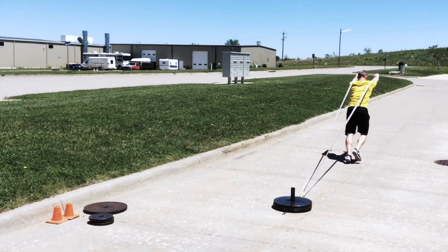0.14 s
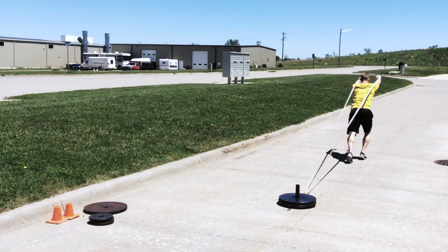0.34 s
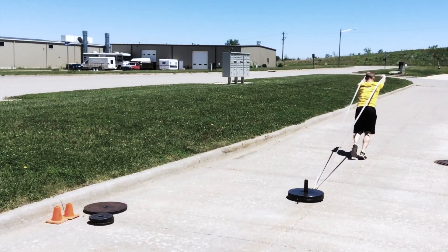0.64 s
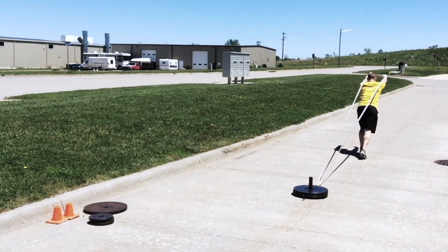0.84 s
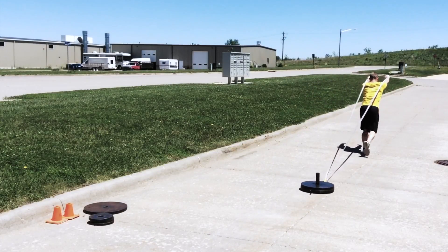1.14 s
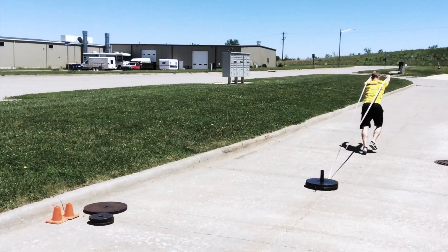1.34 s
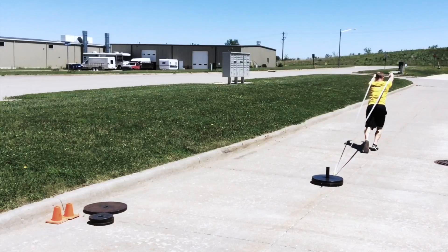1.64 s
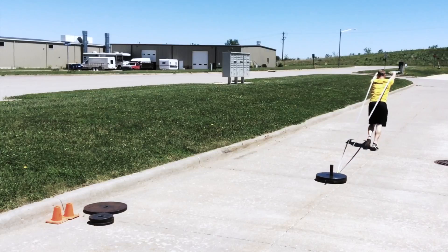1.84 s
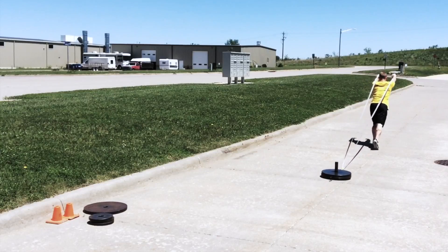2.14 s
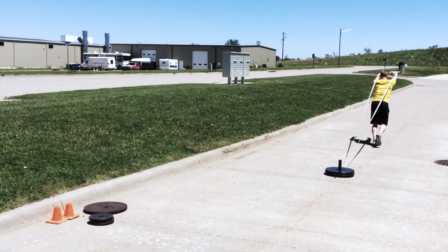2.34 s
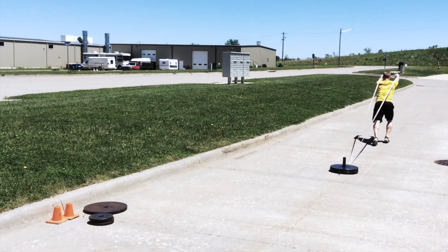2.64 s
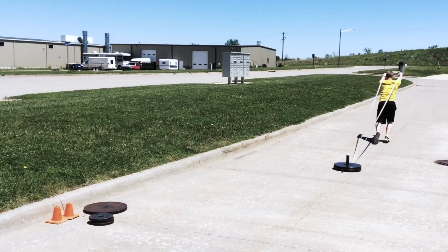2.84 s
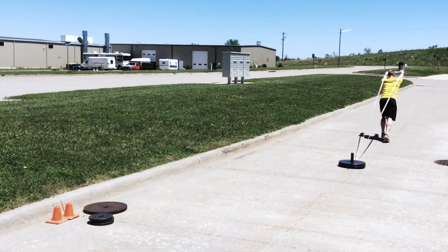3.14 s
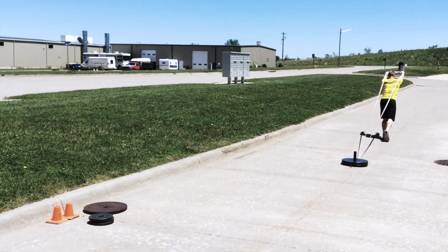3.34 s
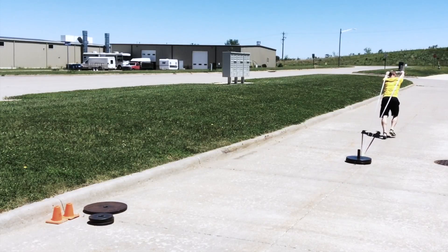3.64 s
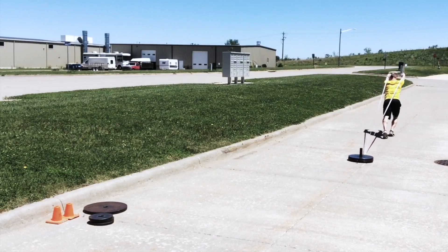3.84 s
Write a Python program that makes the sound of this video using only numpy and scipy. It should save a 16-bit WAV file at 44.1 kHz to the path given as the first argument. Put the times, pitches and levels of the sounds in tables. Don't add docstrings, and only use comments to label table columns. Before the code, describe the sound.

Gritty steel scraping of a dragged sled on concrete, fading with distance under buffeting wind.

```python
import sys
import numpy as np
from scipy import signal
from scipy.fft import rfft, irfft, next_fast_len
from scipy.io import wavfile
from scipy.ndimage import uniform_filter1d, map_coordinates

SR = 44100
rng = np.random.default_rng(int(sys.argv[2]) if len(sys.argv) > 2 else 0)


def voltage_ratio(level):
    return 10 ** (np.asarray(level, float) / 20)


def unload_wav(signal):
    wavfile.write(
        sys.argv[1],
        SR,
        np.round(np.clip(np.atleast_2d(signal).T, -1, 1) * 32767).astype(np.int16),
    )


N = 176400
FULL_SCALE = 0.086


def unit(x):
    return x / np.sqrt(np.mean(x ** 2) + 1e-20)


def noise():
    return rng.standard_normal(N)


def along(points, hz):
    f, v = np.transpose(points)
    return np.interp(np.log(hz + 0.045), np.log(f + 0.081), v)


def curve(rows):
    return np.interp(np.arange(N) / SR, *np.transpose(rows))


def wobble(rate):
    return map_coordinates(rng.standard_normal(400), [np.arange(N) * rate / SR])


def smeared(x, bins, frames):
    return uniform_filter1d(uniform_filter1d(x, size=bins, axis=0), size=frames, axis=1)


def filtered(x, response):
    m = next_fast_len(N + SR)
    return irfft(rfft(x, m) * response(np.fft.rfftfreq(m, 1 / SR)), m)[..., :N]


def coloured(x, response):
    gain = np.abs(response(np.linspace(1, SR / 2, num=20000)))
    return filtered(x, response) / np.sqrt(np.mean(gain ** 2))


def ringing(modes):
    def response(f):
        total = 0
        for k, (c, w, db) in enumerate(modes):
            total = total + (-1) ** k * voltage_ratio(db) * 1j * f * w / (c * c - f * f + 1j * f * w)
        return total
    return response


def bursts(events, t60, rise):
    out, t = np.zeros(N + SR), np.arange(SR // 5) / SR
    for s, db in events:
        shape = voltage_ratio(db - 60 * t / t60) * (1 - np.exp(-t / rise))
        out[round(s * SR):][:len(t)] += shape * rng.standard_normal(len(t))
    return out[:N]


# (time [s], level [dB])
WIND = [(0.0, -36.5), (0.07, -23), (0.34, -48), (0.43, -23.5), (0.96, -41), (1.5, -40.5), (1.99, -27.5),
        (2.16, -32.5), (2.36, -28.5), (2.41, -63), (2.61, -22), (2.77, -29.5), (3.13, -46), (3.22, -26),
        (3.27, -27), (4.0, -24)]
# (frequency [Hz], level [dB per Hz])
BUFFET = [(1, 5.5), (5, -9), (10, -2.5), (25, -5), (45, -26), (80, -95), (150, -79), (400, -63.5)]


def buffeting():
    slow = unit(filtered(noise(), lambda f: voltage_ratio(along(BUFFET, f))))
    free = voltage_ratio(curve(WIND)) * slow
    return 0.8 * FULL_SCALE * np.tanh(free / (1.17 * FULL_SCALE))


# (time [s], level [dB])
GUSTS = [(0.0, -60.5), (0.3, -57.5), (0.55, -60), (.9, -63), (1.3, -70), (1.42, -41), (1.7, -44.5),
         (1.83, -50.5), (1.97, -44.5), (2.06, -56), (2.3, -62.5), (2.45, -54.5), (3.0, -62.5), (3.12, -40),
         (3.24, -58), (3.33, -45), (3.5, -49.5), (3.75, -56.5)]
EDDY_HZ, EDDY_DB = 33.3, 2.5
FLUTTER_DB = -19.5


def turbulence():
    def rumble(f):
        band = 1j * f * EDDY_HZ / (EDDY_HZ + 1j * f) ** 2
        return band / (1 + (f / (1.53 * EDDY_HZ)) ** 3)

    flutter = ringing([(120, 123, 0)])
    eddies = unit(filtered(noise(), rumble))
    eddies = eddies + voltage_ratio(FLUTTER_DB) * unit(filtered(noise(), lambda f: flutter(f) ** 2))
    return voltage_ratio(curve(GUSTS) + EDDY_DB + 2 * wobble(9)) * eddies


DROOP_S = 0.078


def pinned(s, length, pressure):
    return pressure * np.exp(-np.clip(np.arange(N) / SR - s, 0, length) / DROOP_S)


def hits_hard(s, length, pressure):
    return length > 0 and not -FULL_SCALE < pressure < 0


# (time [s], length [s], pressure [1])
SURGES = [(1.376, .027, .092), (1.4385, .0265, .055), (1.5197, .0236, -.15), (1.6817, .0196, -.15),
          (1.766, .045, .098), (1.8328, .0354, -.16), (2.031, .074, -.082), (3.0795, .0185, .075),
          (3.1184, .0173, -.15), (3.286, .012, .082), (3.322, .012, .064), (3.3813, .0225, -.15),
          (3.549, .047, -.076)]
# (time [s], pressure [1])
SWELLS = [(.069, .036), (.137, -.015), (.217, .026), (.285, -.015), (.316, .002), (.351, -.019),
          (.423, .026), (.477, -.068), (.571, .03), (.65, -.011), (.727, .012), (.77, -.024), (1.21, .016),
          (1.259, -.01), (1.42, .014), (1.483, -.02), (1.495, .01), (1.589, .064), (1.61, .012),
          (1.625, .04), (1.642, -.005), (1.662, .056), (1.721, .01), (1.741, -.034), (1.827, -.078),
          (1.921, .024), (1.942, -.018), (1.962, .08), (1.971, .05), (1.98, .062), (2.173, .036),
          (2.219, -.007), (2.334, .064), (2.367, -.028), (2.434, .021), (2.45, -.012), (2.544, -.011),
          (2.607, .049), (2.723, -.053), (2.901, .056), (2.942, -.039), (3.03, .012), (3.056, .08),
          (3.178, .028), (3.192, -.008), (3.211, .038), (3.245, -.016), (3.311, -.01), (3.345, -.008),
          (3.365, -.004), (3.427, -.014), (3.44, -.03), (3.493, .03), (3.62, .022), (3.713, .069),
          (3.775, -.05), (3.862, .036), (3.929, -.027), (4, .038)]
SWELL_S, SURGE_RISE_S = 0.0653, 0.05
SURGE_FALL_S, EASE_S = 0.0199, 0.031


def wind():
    free, eddies, t = buffeting(), turbulence(), np.arange(N) / SR
    pushes = sorted(SURGES + [(s, 0, pressure) for s, pressure in SWELLS])
    start, end = np.transpose([(s, s + length) for s, length, _ in pushes])
    gaps = np.r_[1, start[1:] - end[:-1], 1]
    pull, goal, calm = np.zeros(N), np.zeros(N), np.ones(N)
    for k, (s, length, pressure) in enumerate(pushes):
        snaps = length > 0 and abs(pressure) < 1.3 * FULL_SCALE
        rise_s = fall_s = SWELL_S
        if length:
            rise_s, fall_s = SURGE_RISE_S, SURGE_FALL_S if snaps else EASE_S
        rise = np.clip((s - t) / min(rise_s, gaps[k]), 0, 1)
        fall = np.clip((t - s - length) / min(fall_s, gaps[k + 1]), 0, 1)
        slams = k + 1 < len(pushes) and hits_hard(*pushes[k + 1]) and not length
        approach = (1 - rise ** (1 if hits_hard(s, length, pressure) else 2)) ** 2
        release = (1 - fall ** (1 if snaps else 2)) ** (1 if slams else 2)
        near = approach * release
        pull += near
        calm *= 1 - near * (length > 0)
        goal += near * np.clip(pinned(s, length, pressure), -FULL_SCALE, FULL_SCALE)
    return free * np.clip(1 - pull, 0, 1) + eddies * calm + goal / np.maximum(pull, 1)


# (time [s], peak [dB], clatter over the thud [dB])
BUMPS = [(0.141, -53, -28), (0.254, -80, -16), (0.516, -71, 9), (0.616, -60, -22), (0.656, -48.5, -5),
         (0.693, -58.5, -25), (1.048, -50.5, 8), (1.078, -51.5, 0), (1.2, -57, 9.5), (1.272, -77, -6),
         (1.314, -46.5, -1.5), (1.867, -55, 8.5), (1.888, -52, -2), (1.912, -41.5, -3.5),
         (1.959, -46.5, -4.5), (2.225, -56, -10), (2.265, -57, 13), (2.281, -42.5, 2.5),
         (2.307, -52.5, -12), (2.322, -51, 0.5), (2.51, -46, -3), (2.995, -69, 0), (3.245, -62, 5.5),
         (3.321, -73, -23), (3.445, -68, -24), (3.629, -63, 0), (3.653, -55, -5), (3.722, -68, 1),
         (3.846, -54.5, 1.5), (3.905, -49.5, 2.5)]
# (time [s], peak [dB])
KNOCKS = [(0.029, -56), (0.29, -78), (0.398, -80), (0.551, -68), (0.748, -67), (0.798, -69), (0.939, -65),
          (1.15, -71), (1.251, -72), (1.647, -69), (1.99, -56), (2.118, -59), (2.401, -69), (2.478, -60),
          (2.58, -71), (2.836, -86), (2.998, -78), (3.21, -68), (3.724, -62), (3.777, -72), (3.89, -56),
          (3.944, -59)]
# (frequency [Hz], width [Hz], level [dB])
LOAD = [
    (183.2, 41, -1.5),
    (247, 90, -3),
]
# (frequency [Hz], width [Hz], level [dB])
CLATTER = [
    (607, 150, -2.5),
    (1005, 210, 0),
    (1280, 430, -2.5),
    (2650, 1500, -12.5),
]
BUMP_T60_S, BUMP_RISE_S, BUMP_DB, KNOCK_DB = 0.057, 0.012, 5.5, 6
CLATTER_T60_S, CLATTER_RISE_S, CLATTER_DB = 0.12, 0.013, 0.5


def bumps():
    chatter = voltage_ratio(curve(DRAG) - 22 + 3 * np.tanh(wobble(26))) * noise()
    thuds = voltage_ratio(BUMP_DB) * bursts([(s, db) for s, db, _ in BUMPS], BUMP_T60_S, BUMP_RISE_S)
    knocks = voltage_ratio(KNOCK_DB) * bursts(KNOCKS, BUMP_T60_S, BUMP_RISE_S)
    clanks = [(s, db + over_db) for s, db, over_db in BUMPS]
    clatter = voltage_ratio(CLATTER_DB) * bursts(clanks, CLATTER_T60_S, CLATTER_RISE_S)
    body = ringing(LOAD)
    dull = coloured(thuds + knocks + chatter, lambda f: body(f) / (1 + 1j * f / 450))
    return dull + coloured(clatter, ringing(CLATTER))


GRAIN_S, GRAIN_SPREAD_DB, GRAINS_DB, PING_DB = 0.0016, -4.5, -5.5, 3.5


def friction():
    z = signal.stft(noise(), nperseg=512)[2]
    field = unit(smeared(rng.standard_normal(z.shape), 4, 6))
    pings = unit(smeared(rng.standard_normal(z.shape), 2, 4))
    hiss = unit(signal.istft(z * voltage_ratio(field + PING_DB * pings), nperseg=512)[1][:N])
    struck = rng.random(N) < 500 / SR
    grains = struck * voltage_ratio(GRAIN_SPREAD_DB * np.minimum(rng.exponential(size=N), 2.5))
    grains = signal.lfilter([1], [1, -np.exp(-1 / (GRAIN_S * SR))], grains) * noise()
    unsteady_db = 0.51 * wobble(7.2) + 0.72 * wobble(29.61) + 0.69 * wobble(80)
    return unit(hiss + voltage_ratio(GRAINS_DB) * unit(grains)) * voltage_ratio(unsteady_db)


# (time [s], peak [dB])
TICKS = [(0.1168, -35.5), (0.2033, -25), (0.2639, -36), (0.294, -31.5), (0.5077, -24.5), (0.8714, -32),
         (0.897, -32), (0.9868, -32.5), (1.0804, -31), (1.1129, -52), (1.2959, -28.5), (1.7567, -25.5),
         (2.1245, -40), (2.171, -33.5), (2.198, -33.5), (2.289, -35), (2.4344, -33), (2.8784, -34)]
TICK_T60_S, TICK_RISE_S, TICK_DB = 0.025, 0.00046, -15.5


def stones():
    runner = ringing([(2800, 1100, 0)])
    snaps = bursts(TICKS, TICK_T60_S, TICK_RISE_S)
    return voltage_ratio(TICK_DB) * filtered(snaps, lambda f: 1.03 + runner(f))


# (time [s], level [dB])
DRAG = [(0, -51), (.3, -54.5), (.42, -57), (.7, -52.5), (.95, -55.5), (1.3, -52), (1.45, -58.5),
        (1.65, -58), (1.9, -56), (2.1, -55.5), (2.3, -55), (2.6, -58), (2.8, -59), (3.0, -56), (3.3, -60),
        (3.6, -56.5), (3.9, -57.5), (4, -58.5)]
# (frequency [Hz], level [dB per Hz])
GRIT = [(180, -23), (300, -10.5), (410, -11.5), (934, -6), (2430, 3.5), (5090, 0.5), (6300, -3.5),
        (7940, -6), (15300, -22.5)]
# (frequency [Hz], width [Hz], level [dB])
STEEL = [(355, 5.8, 18), (590, 107, 9.5), (952, 31, 16), (1325, 158, 7.5), (2433, 43, 0), (3120, 530, -10),
         (4950, 230, -9.5), (8550, 990, 12.5), (9340, 450, 15), (14600, 4600, 10.5)]
STEEL_DB = -4.5
NOTCH_HZ, NOTCH_WIDTH_HZ, NOTCH_DEPTH = 6200, 170, 0.62


def scrape():
    steel = ringing(STEEL)

    def sled(f):
        grit = voltage_ratio(np.where(f < 250, -120, along(GRIT, f)))
        port = 1 - NOTCH_DEPTH / (1 + ((f - NOTCH_HZ) / NOTCH_WIDTH_HZ) ** 2)
        return grit * (1 + voltage_ratio(STEEL_DB) * np.abs(steel(f))) * port

    return coloured(friction() * voltage_ratio(curve(DRAG)) + stones(), sled)


def scene():
    return (scrape() + bumps() + wind())[None]


GATE_DB, GATE_FROM_HZ = -76, 5500


def gated(x):
    hz, _, z = signal.stft(x, SR, nperseg=1024)
    unsteady_db = 3.9 * unit(smeared(rng.standard_normal(z.shape), 4, 8))
    limit = voltage_ratio(GATE_DB + unsteady_db) ** 2 * 1.8 / 1024
    keep = (smeared(np.abs(z) ** 2, 4, 8) > limit) | (hz < GATE_FROM_HZ)[:, None]
    return signal.istft(z * keep, SR, nperseg=1024)[1][:N]


CLOSE_S = 0.0035
PINNED_HISS_DB, PINNED_WIDTH_HZ, LEAK_DB = -65.5, 1940, -83


def dropouts(out):
    t = np.arange(N) / SR
    for s, length, pressure in SURGES:
        hz, hiss_db, leak_db = (14700, 0, 8) if pressure > 0 else (12900, -0.5, 0)
        hiss = coloured(noise(), lambda f: 1 / (1 + ((f - hz) / PINNED_WIDTH_HZ) ** 2))
        sag = pinned(s, length, pressure)
        left = (out - np.clip(sag, -FULL_SCALE, FULL_SCALE)) * np.exp(-np.abs(t - s) / CLOSE_S)
        held = sag + left + voltage_ratio(PINNED_HISS_DB + hiss_db) * hiss
        held = held + voltage_ratio(LEAK_DB + leak_db) * noise()
        out = np.where((t >= s) & (t < s + length), held, out)
    return out


FLOOR_DB, ROLL_OFF_HZ, TOP_HZ = -91, 15300, 15500


def band_limit(x):
    return signal.sosfilt(signal.butter(12, 15480, fs=SR, output="sos"), x)


def record(dry):
    out = dry[0] + voltage_ratio(FLOOR_DB) * noise()
    out = gated(filtered(out, lambda f: 1 / (1 + (f / ROLL_OFF_HZ) ** 12)))
    out = np.clip(dropouts(out), -FULL_SCALE, FULL_SCALE)
    out = filtered(out, lambda f: f < TOP_HZ)
    return band_limit(out[None])


dry = scene()
out = record(dry)
unload_wav(out)
```